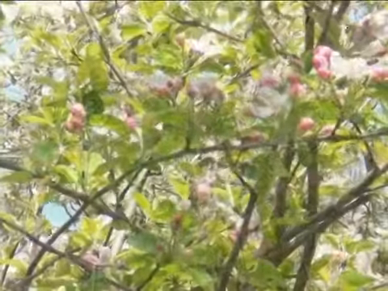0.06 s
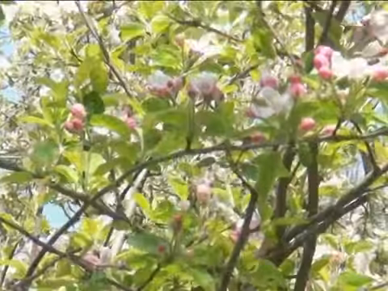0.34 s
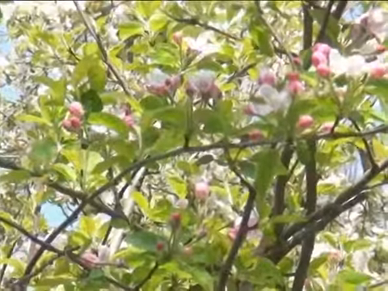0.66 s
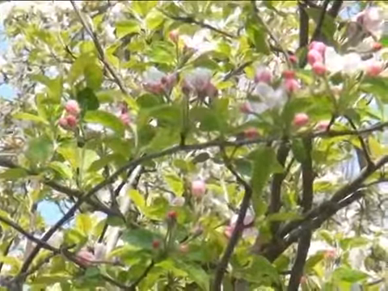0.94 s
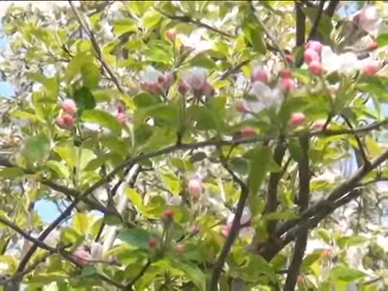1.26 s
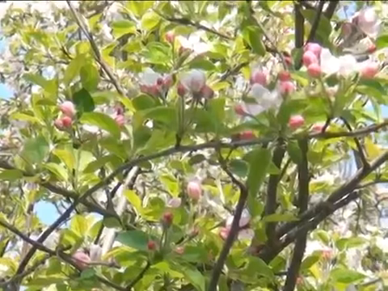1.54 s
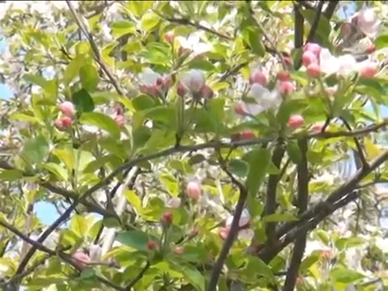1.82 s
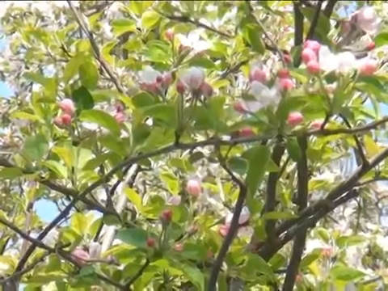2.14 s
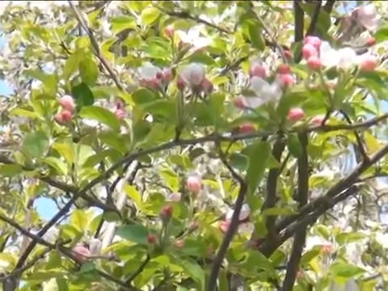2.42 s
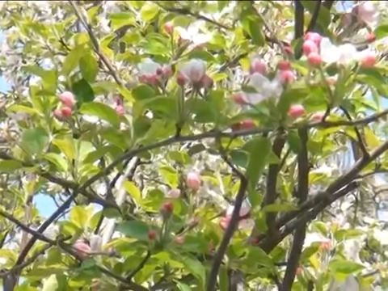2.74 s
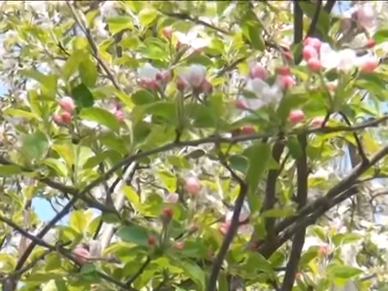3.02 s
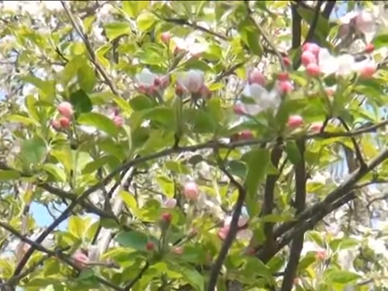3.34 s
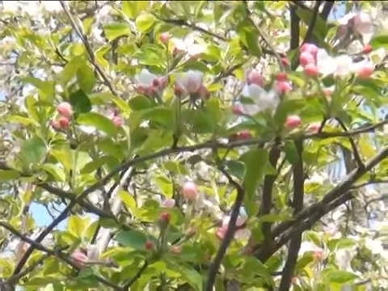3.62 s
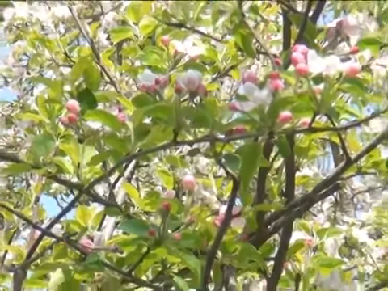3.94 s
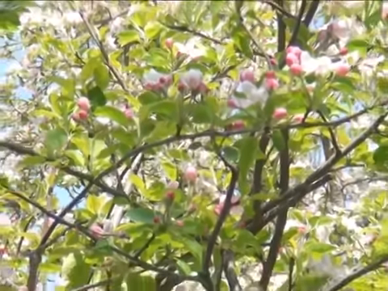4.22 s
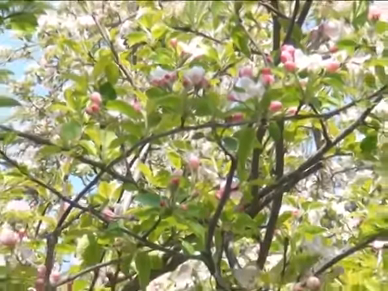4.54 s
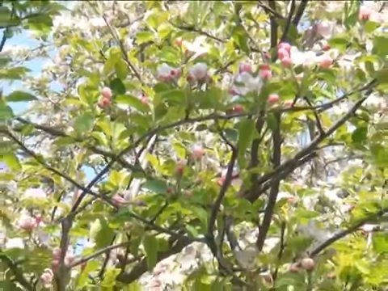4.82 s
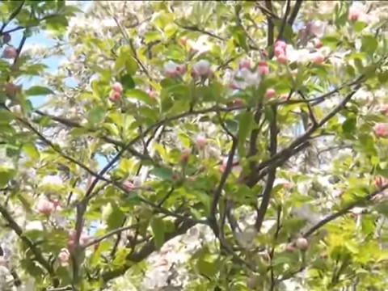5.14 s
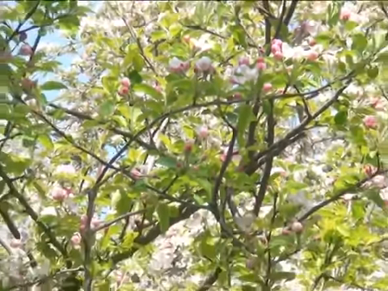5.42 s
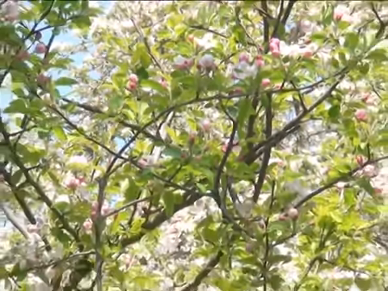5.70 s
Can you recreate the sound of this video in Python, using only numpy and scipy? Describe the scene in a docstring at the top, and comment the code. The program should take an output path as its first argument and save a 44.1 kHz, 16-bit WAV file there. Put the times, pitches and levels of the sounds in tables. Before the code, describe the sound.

Outdoors among trees, a faint hush of air and a few soft chips give way to a nearby thrush singing a fast row of falling whistles. It ends the row with a bright, quick flourish, rests briefly, then goes on with scattered harsh and clear notes, a short buzz and dry rattles. The leaves add a slight echo, and distant birds whistle thinly behind.

```python
"""A faint outdoor hush and a few soft chips, then a thrush sings in a blossoming tree close to the
microphone: fourteen falling whistles, a quick flourish, more chips, a snarl, a buzz and dry rattles.
Its throat is a narrow resonance: tuned to the fundamental it gives pure whistles, tuned to an overtone
it gives rasps. Leaves and branches scatter every note; other birds whistle far off."""
import sys
import numpy as np
from scipy import signal
from scipy.fft import rfft, irfft
from scipy.io import wavfile
from scipy.ndimage import uniform_filter1d

SR = 44100
rng = np.random.default_rng(int(sys.argv[2]) if len(sys.argv) > 2 else 0)


def int16_out(signal):
    """Quantize to a 16-bit WAV file."""
    q = np.round(np.clip(np.atleast_2d(signal).T, -1, 1) * 32767)
    wavfile.write(sys.argv[1], SR, q.astype(np.int16))


N = 258867

# spectra of the air around the microphone, low and high: (frequency [Hz], relative level [dB])
AIR_RUMBLE = [(25, -6.5), (82, 0), (120, -7.5), (190, -14.5), (450, -13.5), (950, -21)]
AIR_HISS = [(590, -39.5), (1000, -5.5), (2010, -6), (3150, -12), (4650, -13), (6260, -16), (14500, -19),
            (15500, -29.5)]
# harsh chips: (start [s], length [s], first pitch [Hz], last pitch [Hz], level [dB], throat [Hz])
CHIPS = [(.05, .016, 1320, 810, -43, 1950), (3.1528, .017, 2200, 1350, -15.3, 5300),
         (4.122, .011, 1400, 1000, -33, 2250), (4.3405, .008, 1080, 1650, -31.5, 4350)]
# one thin squeak: (start [s], length [s], first pitch [Hz], last pitch [Hz], level [dB], throat [Hz])
SQUEAK = (.293, .022, 3250, 2400, -40, 4150)
# birds far off: (start [s], length [s], first pitch [Hz], turning pitch [Hz], last pitch [Hz],
# turning point [0-1], level [dB])
FAR_WHISTLES = [(.37, .19, 1850, 1790, 2000, .3, -67), (.58, .19, 2200, 2300, 2170, .4, -55.5),
                (1.09, .2, 2170, 2380, 2330, .75, -58.5), (1.34, .1, 2280, 2330, 2230, .4, -65),
                (3.55, .12, 4700, 4650, 4200, .3, -77), (3.78, .28, 1950, 2003, 2000, .6, -71),
                (4.1, .2, 2650, 2720, 2500, .25, -73), (4.675, .06, 4100, 4150, 4300, .3, -65),
                (5.05, .09, 3200, 3850, 3250, .45, -63), (5.8, .07, 4310, 4400, 4150, .4, -56)]
# creaks at their peak of effort: (time [s], pitch [Hz], level [dB], throat [Hz])
CREAKS = [(.497, 1750, -35, 3050), (.545, 2020, -32.5, 3700), (.593, 2020, -30.2, 3600)]
# the row of falling whistles: (start [s], length [s], first pitch [Hz], last pitch [Hz],
# share held before the fall [0-1], level [dB])
SLURS = [(0.743, 0.086, 3301, 2941, 0.27, -21.5), (0.894, 0.089, 3209, 2894, 0.15, -21.3),
         (1.04, 0.084, 3147, 2830, 0.53, -16.6), (1.171, 0.087, 3196, 2821, 0.5, -15.7),
         (1.317, 0.086, 3160, 2808, 0.51, -15.3), (1.452, 0.094, 3092, 2810, 0.59, -15.9),
         (1.588, 0.098, 3073, 2881, 0.52, -16.0), (1.731, 0.098, 3190, 2810, 0.29, -15.3),
         (1.876, 0.098, 3148, 2864, 0.47, -13.9), (2.025, 0.093, 3200, 2788, 0.4, -14.1),
         (2.163, 0.101, 3188, 2750, 0.45, -15.1), (2.305, 0.099, 3129, 2742, 0.41, -14.1),
         (2.448, 0.105, 3209, 2706, 0.42, -14.7), (2.596, 0.1, 3142, 2788, 0.45, -13.5)]
# overtones leaking past the throat, in slurs and in clear notes: (harmonic [number], relative level [dB])
SLUR_OVERTONES = [(2, -32.5), (3, -41.5), (4, -50)]
CLEAR_OVERTONES = [(2, -38), (3, -45), (4, -58)]
# runs of soft low pips: (first pip [s], spacing [s], pips [count], pitch [Hz], level [dB])
PIP_RUNS = [(2.7635, .009, 4, 1500, -33), (5.039, .007, 3, 1450, -48), (5.379, .025, 2, 1560, -39)]
# quick bending notes: (start [s], length [s], first pitch [Hz], turning pitch [Hz], last pitch [Hz],
# turning point [0-1], loudest point [0-1], level [dB])
BENDS = [(2.794, .031, 1400, 2220, 1350, .58, .62, -18), (2.882, .018, 2900, 3770, 3600, .65, .68, -14.5),
         (2.895, .04, 2950, 3810, 3450, .78, .48, -10.5), (2.944, .029, 3250, 4020, 3960, .62, .6, -11),
         (3.032, .023, 2150, 1960, 2780, .22, .65, -17), (4.994, .026, 2500, 2170, 2170, .4, .8, -28.5),
         (5.143, .024, 3340, 3360, 3560, .3, .85, -26.5), (5.6025, .052, 1800, 2340, 3500, .18, .6, -14.3),
         (5.648, .016, 3700, 3600, 1400, .1, .55, -22)]
# diving notes: (start [s], length [s], top pitch [Hz], settled pitch [Hz],
# first level [dB], last level [dB])
DIVES = [(3.0612, .039, 3850, 2540, -15, -16.5), (5.1825, .103, 5050, 2620, -20.3, -27.3)]
# one snarl: (start [s], length [s], slack pitch [Hz], full pitch [Hz], level [dB],
# first throat [Hz], last throat [Hz])
SNARL = (4.524, .112, 1100, 1850, -35.5, 4900, 2450)
# path of one high whistle: (time [s], pitch [Hz], level [dB])
SCOOP = [(4.768, 5717, -49), (4.78, 5471, -30), (4.822, 4581, -34), (4.852, 4516, -30), (4.862, 4641, -28),
         (4.882, 5609, -22), (4.89, 5717, -33)]
# upper voice of the buzz: (start [s], length [s], first pitch [Hz], turning pitch [Hz],
# last pitch [Hz], level [dB])
BUZZ = (5.4745, .069, 5000, 5800, 6200, -21.5)
# dry rattles: (first tick [s], ticks [count], level [dB])
RATTLES = [(5.722, 4, -32), (5.771, 4, -29), (5.819, 5, -27.5)]


def from_db(db):
    """Decibels to gain."""
    return 10 ** (np.asarray(db) / 20)


def rms_one(x):
    """Scale to unit power."""
    return x / np.sqrt(np.mean(x ** 2) + 1e-20)


def band(x, low_hz, high_hz, order=2):
    """Butterworth band-pass."""
    sos = signal.butter(order, [low_hz, min(high_hz, .45 * SR)], "band", fs=SR, output="sos")
    return signal.sosfilt(sos, x)


def wander(size, rate_hz):
    """Smooth random drift of about unit spread."""
    pole = np.exp(-2 * np.pi * rate_hz / SR)
    noise = rng.standard_normal(size + SR // 10)
    return rms_one(signal.lfilter([1], [1, -2 * pole, pole * pole], noise))[-size:]


def span(start, length):
    """Sample times of one note, and its progress from 0 to 1."""
    t = start + np.arange(max(int(length * SR), 64)) / SR
    return t, np.linspace(0, 1, len(t))


def fade(t, attack_s=.0065, release_s=.0045):
    """Rounded attack, hold, rounded release."""
    rise, fall = np.clip((t - t[0]) / attack_s, 0, 1), np.clip((t[-1] - t) / release_s, 0, 1)
    return (np.sin(np.pi / 2 * rise) * np.sin(np.pi / 2 * fall)) ** 2


def bend(u, first_hz, turn_hz, last_hz, turn):
    """Pitch that eases into a turning point and speeds away from it."""
    away = np.interp(u, [0, turn, 1], [-1, 0, 1])
    return turn_hz + (np.where(away < 0, first_hz, last_hz) - turn_hz) * np.abs(away) ** 1.5


def add(out, t, note):
    """Lay a note into a track at its time, with rounded ends."""
    edge = np.clip(np.minimum(t - t[0], t[-1] - t) / .0007, 0, 1)
    start = max(int(t[0] * SR), 0)
    part = (note * np.sin(edge * np.pi / 2) ** 2)[:max(N - start, 0)]
    out[start:start + len(part)] += part


def hush(spectrum, level_db, side_db, low_hz, high_hz):
    """Steady outdoor air, almost the same left and right."""
    hz = np.maximum(np.arange(N // 2 + 1) * SR / N, 1)
    points_hz, points_db = np.transpose(spectrum)
    gain = from_db(np.interp(np.log(hz), np.log(points_hz), points_db)) * (hz > low_hz) * (hz < high_hz)
    mid, side = irfft(rfft(rng.standard_normal((2, N))) * gain, N)
    return from_db(level_db) * (rms_one(mid) + from_db(side_db) * rms_one(side) * [[1], [-1]])


def rasp(hz, level_db, throat_hz, width_hz, jitter, hoarse, top_hz):
    """Overtones of an unsteady pitch; the throat picks out those near its resonance."""
    size = len(hz)
    phase = 2 * np.pi * np.cumsum(hz * (1 + jitter * wander(size, 900))) / SR
    k = np.arange(1, 11)[:, None]
    detune = (k * hz / throat_hz - throat_hz / (k * hz)) * throat_hz / width_hz
    rolloff = 1 / (1 + (k * hz / top_hz) ** 22)
    gain = rolloff / np.sqrt(1 + detune ** 2)
    tone = (gain * np.sin(k * phase - np.arctan(detune))).sum(0) / np.sqrt((gain ** 2).sum(0) / 2)
    # uneven cycles fill the gaps between the overtones
    uneven = 1 + hoarse * rms_one(band(rng.standard_normal(size + 2000), 150, 700))[-size:]
    return from_db(level_db) * tone * uneven / np.sqrt(1 + hoarse ** 2)


def harsh_voice(hz, level_db, throat_hz):
    """The near bird with its throat tuned to an overtone."""
    return rasp(hz, level_db, throat_hz, width_hz=800, jitter=.015, hoarse=.25, top_hz=throat_hz + 2100)


def chips(loudest=.35, sag_db=24, throat_follows=.35):
    """Short harsh glides at close range; the throat follows part of each glide."""
    out = np.zeros(N)
    for start, length, first_hz, last_hz, db, throat_hz in CHIPS:
        t, u = span(start, length)
        hz = np.geomspace(first_hz, last_hz, len(t))
        resonance_hz = throat_hz * (hz / hz.mean()) ** throat_follows
        add(out, t, harsh_voice(hz, db - sag_db * np.abs(u - loudest), resonance_hz))
    return out


def sizzle(song, gain_db, growth, from_hz, linger_s=.002):
    """A high hiss rides on the near notes, growing as they get loud and shrill."""
    shrill = band(song, from_hz, 8000)
    keep = np.exp(-1 / (linger_s * SR))
    loudness = np.sqrt(signal.lfilter([1 - keep], [1, -keep], shrill ** 2 + 1e-18))
    hiss = rms_one(band(rng.standard_normal(N), 9400, 15000, order=4))
    return from_db(gain_db) * loudness ** growth * hiss


def foliage(song, near_db, near_t60, far_db, far_t60):
    """The direct song, dense quick echoes from nearby twigs, then a weak tail from the trees around."""
    t = np.arange(SR) / SR
    near = rng.standard_normal(SR) * from_db(-60 * t / near_t60) * (t > .002)
    far = rng.standard_normal(SR) * from_db(-60 * t / far_t60) * (t > .015)
    echo = from_db(near_db) * near / np.linalg.norm(near) + from_db(far_db) * far / np.linalg.norm(far)
    return song + signal.fftconvolve(song, echo)[:N]


def squeak():
    """One thin, clean note slides down below a steady throat resonance."""
    out = np.zeros(N)
    start, length, first_hz, last_hz, db, throat_hz = SQUEAK
    t, u = span(start, length)
    hz = np.geomspace(first_hz, last_hz, len(t))
    note = rasp(hz, db, throat_hz, width_hz=720, jitter=.004, hoarse=0, top_hz=7600)
    add(out, t, np.sin(np.pi * u) * note)
    return out


def whistle(hz, level_db, jitter, waver, shimmer_db, overtones=()):
    """A near sine whose pitch trembles and wavers; any overtones flicker above it."""
    size = len(hz)
    unsteady = 1 + jitter * wander(size, 350) + waver * wander(size, 45)
    phase = 2 * np.pi * np.cumsum(hz * unsteady) / SR
    leak = sum(from_db(db + 2.6 * wander(size, 120)) * np.sin(round(k) * phase) * (k * hz < SR / 2)
               for k, db in overtones)
    return np.sqrt(2) * (np.sin(phase) + leak) * from_db(level_db + shimmer_db * wander(size, 90))


def far_birds(sag_db=12):
    """Thin distant whistles, loudest mid-note, blurred by the trees on their way to the microphone."""
    out = np.zeros(N)
    for start, length, first_hz, turn_hz, last_hz, turn, db in FAR_WHISTLES:
        t, u = span(start, length)
        hz = bend(u, first_hz, turn_hz, last_hz, turn)
        add(out, t, whistle(hz, db - sag_db * np.abs(u - .5), jitter=0, waver=.011, shimmer_db=3))
    return foliage(out, near_db=1, near_t60=.1, far_db=-9.5, far_t60=.6)


def creaks(rise_s=.018, fall_s=.009, peak_s=.006, pitch_drop=.5, range_db=20):
    """Pitch and level both follow a sharp peak of effort."""
    out = np.zeros(N)
    for peak, peak_hz, db, throat_hz in CREAKS:
        t, _ = span(peak - rise_s, rise_s + fall_s)
        slack = 1 - np.exp(-np.abs(t - peak) / peak_s)
        add(out, t, harsh_voice(peak_hz * (1 - pitch_drop * slack), db - range_db * slack, throat_hz))
    return out


def slurs(swell_db=42, swell_share=.618, quiver_hz=75, quiver_db=1.6, hook_hz=60, hook_s=.005):
    """The close row of falling whistles: each swells on a held pitch, sags, quivers and stops."""
    out = np.zeros(N)
    for start, length, first_hz, last_hz, hold, db in SLURS:
        t, u = span(start, length)
        hz = np.interp(u, [hold, 1], [first_hz, last_hz])
        hz -= hook_hz * np.exp((t - t[-1]) / hook_s)   # the pitch hooks down on release
        # the voice starts to quiver in the second half of the note
        quiver = np.clip(4 * u - 2, 0, 1) * np.sin(2 * np.pi * (quiver_hz * t + rng.random()))
        hz *= 1 + .003 * quiver
        level_db = db - swell_db * np.clip(1 - u / swell_share, 0, 1) ** 2 + quiver_db * quiver
        note = whistle(hz, level_db, jitter=.0012, waver=.004, shimmer_db=.4, overtones=SLUR_OVERTONES)
        add(out, t, fade(t, attack_s=.012, release_s=.0238) * note)
    return out


def pips(half_s=.0049, fall=.15, scatter=.035):
    """Soft low pips, each a quick fall in pitch with the throat on the fundamental."""
    out = np.zeros(N)
    for first, spacing, count, pitch_hz, db in PIP_RUNS:
        for k in range(round(count)):
            t, u = span(first + k * spacing - half_s, 2 * half_s)
            hz = pitch_hz * (1 + fall * (1 - 2 * u) + scatter * rng.standard_normal())
            note = rasp(hz, db, throat_hz=hz, width_hz=350, jitter=.018, hoarse=.18, top_hz=4270)
            add(out, t, np.sin(np.pi * u) * note)
    return out


def clear_voice(hz, level_db):
    """The near bird with its throat tuned to the fundamental."""
    return whistle(hz, level_db, jitter=.004, waver=.002, shimmer_db=.6, overtones=CLEAR_OVERTONES)


def bends(sag_db=16):
    """Quick clear notes whose pitch bends once."""
    out = np.zeros(N)
    for start, length, first_hz, turn_hz, last_hz, turn, loudest, db in BENDS:
        t, u = span(start, length)
        hz = bend(u, first_hz, turn_hz, last_hz, turn)
        add(out, t, fade(t) * clear_voice(hz, db - sag_db * np.abs(u - loudest)))
    return out


def dives(dive_s=.0078, sag_hz_per_s=1700, accent_db=7.5):
    """Clear notes that dive from an accented top and level out into a slow sag."""
    out = np.zeros(N)
    for start, length, top_hz, settled_hz, first_db, last_db in DIVES:
        t, u = span(start, length)
        height = np.exp(-(t - start) / dive_s)
        hz = settled_hz + (top_hz - settled_hz) * height - sag_hz_per_s * (t - start)
        level_db = first_db + (last_db - first_db) * u + accent_db * height
        add(out, t, fade(t, attack_s=.0035, release_s=.016) * clear_voice(hz, level_db))
    return out


def snarl(steepness=1.7, flutter_hz=302, flutter_depth=.37):
    """One arch of effort lifts pitch and level while the throat slides down; a fast flutter chops it."""
    out = np.zeros(N)
    start, length, slack_hz, full_hz, db, first_throat_hz, last_throat_hz = SNARL
    t, u = span(start, length)
    effort = np.abs(np.sin(np.pi * u))
    hz = slack_hz + (full_hz - slack_hz) * effort
    throat_hz = np.geomspace(first_throat_hz, last_throat_hz, len(t))
    rate_hz = flutter_hz * (1 + .1 * wander(len(t), 76))
    flutter = 1 + flutter_depth * np.sin(2 * np.pi * np.cumsum(rate_hz) / SR)
    note = rasp(hz, db, throat_hz, width_hz=1000, jitter=.027, hoarse=.55, top_hz=throat_hz + 1700)
    add(out, t, effort ** steepness * flutter * note)
    return out


def scoop():
    """One high whistle scoops smoothly down and up again."""
    out = np.zeros(N)
    times, *columns = np.transpose(SCOOP)
    t = np.arange(times[0], times[-1], 1 / SR)
    hz, level_db = (uniform_filter1d(np.interp(t, times, c), size=66, mode="nearest") for c in columns)
    add(out, t, fade(t) * clear_voice(hz, level_db))
    return out


def buzz(rate_hz=84.5, crest_s=5.4883, swing=.26, throb_db=3, loudest=.21, sag_db=10):
    """Two voices swing together at different pitches, loudest at each crest."""
    out = np.zeros(N)
    start, length, first_hz, turn_hz, last_hz, db = BUZZ
    t, u = span(start, length)
    crest = np.cos(2 * np.pi * rate_hz * (t - crest_s))
    hz = bend(u, first_hz, turn_hz, last_hz, loudest) * (1 + swing * crest)
    level_db = db - np.interp(u, [0, loudest, 1], [sag_db, 0, sag_db]) + throb_db * (crest - 1)
    for ratio, voice_db in (1, 0), (.84, -3):
        add(out, t, whistle(hz * ratio, level_db + voice_db, jitter=.025, waver=0, shimmer_db=2))
    return band(out, 2700, 7350, order=5)


def rattles(spacing_s=.0063, half_s=.00219, tick_hz=1400, first_tick_db=-6.5):
    """Even runs of ticks, the first one softer; each is a very short up-and-down flick of the voice."""
    out = np.zeros(N)
    for first, count, db in RATTLES:
        for k in range(round(count)):
            t, u = span(first + k * spacing_s - half_s, 2 * half_s)
            hz = tick_hz * (1 - np.abs(u - .5))
            level_db = db + first_tick_db * (k == 0)
            flick = rasp(hz, level_db, throat_hz=5300, width_hz=3000, jitter=.08, hoarse=.25, top_hz=7000)
            add(out, t, np.hanning(len(t)) * flick)
    return band(out, 2970, 10600, order=3)


def scene():
    """The thrush close and centred in front of the microphone, far birds and air behind it."""
    row = slurs()
    pure = bends() + dives() + scoop() + pips()
    pure += from_db(8.5) * band(pure, 10300, 12300)   # an upper throat resonance brightens the overtones
    calls = chips() + creaks() + squeak() + snarl()
    chatter = buzz() + rattles()
    row += sizzle(row, gain_db=-45, growth=.89, from_hz=4400)
    row = foliage(row, near_db=-20, near_t60=.17, far_db=-33, far_t60=.45)
    pure += sizzle(pure, gain_db=-32.5, growth=1.4, from_hz=3000)
    pure = foliage(pure, near_db=-18.5, near_t60=.12, far_db=-32.5, far_t60=.45)
    calls += sizzle(calls, gain_db=-18, growth=1.05, from_hz=4600)
    chatter += sizzle(chatter, gain_db=-17.5, growth=.91, from_hz=4800)
    harsh = foliage(calls + chatter, near_db=-9, near_t60=.066, far_db=-27.5, far_t60=.3)
    thrush = band(row + pure + harsh, 1270, SR / 2, order=7)   # a small bird radiates no bass
    air = hush(AIR_RUMBLE, level_db=-69.5, side_db=-18.5, low_hz=10, high_hz=1079.4)
    air += hush(AIR_HISS, level_db=-64, side_db=-17.5, low_hz=996, high_hz=SR / 2)
    return thrush + far_birds() + air


def record(dry):
    """The top is cut steeply; the microphone signal sits slightly off zero."""
    cutoff_hz, offset = 15200, -.0015
    lowpass = signal.ellip(8, .05, 60, cutoff_hz, fs=SR, output="sos")
    return signal.sosfiltfilt(lowpass, dry) + offset


dry = scene()
out = record(dry)
int16_out(out)
```